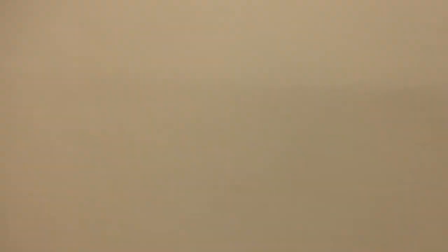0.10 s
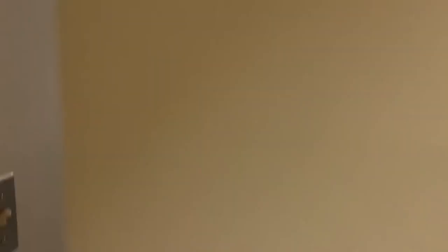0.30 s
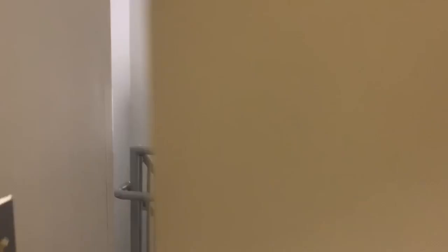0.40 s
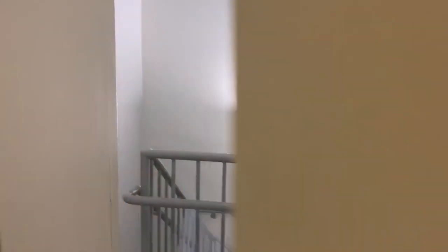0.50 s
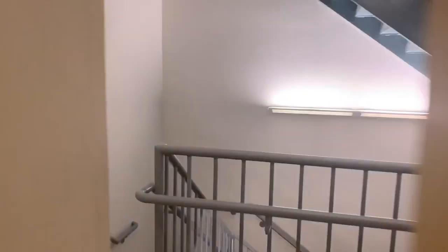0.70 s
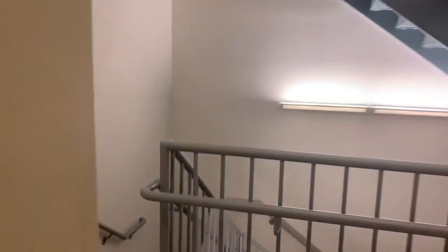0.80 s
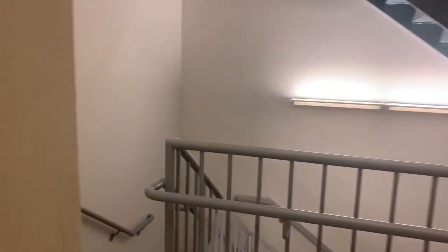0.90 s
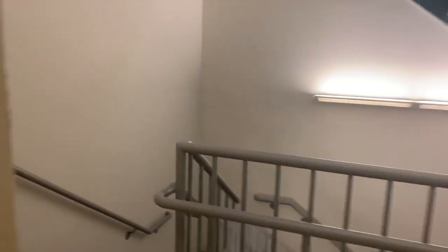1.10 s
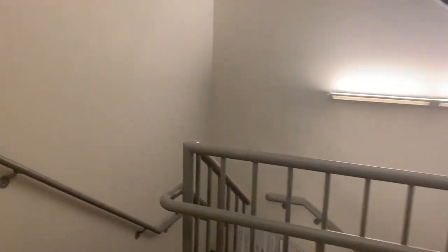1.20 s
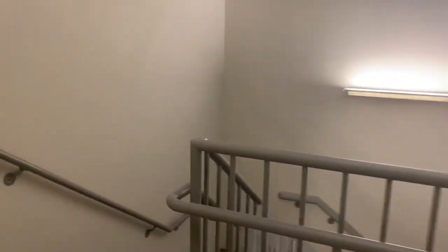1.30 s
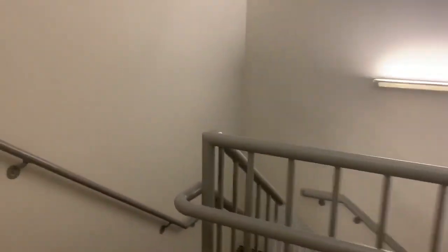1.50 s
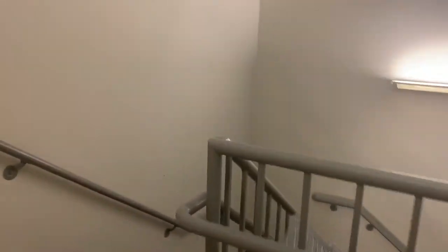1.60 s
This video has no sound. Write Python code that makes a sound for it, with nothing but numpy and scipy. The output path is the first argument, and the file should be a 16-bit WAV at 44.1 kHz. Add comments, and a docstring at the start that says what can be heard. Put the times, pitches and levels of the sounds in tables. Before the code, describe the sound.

Close handheld microphone passing through a heavy door into a hard stairwell: faint rubbing, hinge creak, boomy thuds, then a metallic rattle and hard latch clack, tiny squeak and knock, over quiet building hum.

```python
"""A heavy door is pushed open into a hard-walled stairwell, over the steady hum of the building.
Its hinge sings thin stick-slip notes, while footsteps and the passing air thud at the microphone:
sagging sine cycles for the thumps, low coloured noise for the air.
The push bar rattles in noise bursts with ringing modes, the latch springs out with a sharp clack
that rings the door, and a short squeak and a lighter knock follow in the decaying-noise echo."""
import sys
import numpy as np
from scipy import signal
from scipy.fft import rfft, irfft
from scipy.io import wavfile
from scipy.ndimage import uniform_filter1d

SR = 44100
rng = np.random.default_rng(int(sys.argv[2]) if len(sys.argv) > 2 else 0)


def master(y):
    """Save y as 16-bit WAV."""
    cut = np.clip(np.atleast_2d(y).T, -1, 1)
    pcm = np.round(cut * 32767)  # scale
    wavfile.write(sys.argv[1], SR, pcm.astype(np.int16))


N = 72765
T = np.arange(N) / SR

# spectrum of the rubbing surfaces, shared by rub and ticks [f/Hz, relative density/dB]
RUB_COLOUR = [(300, 1.5), (2000, 0), (5000, -8.5), (8000, -16)]
EARS = np.array([[1], [-1]])  # left, right
WIDE_HZ = 805  # the two ears differ fully above this
ATTACK_S = 0.001
SMALL_PART_DECAY_S = 0.014  # knocks and ticks


def undb(db):
    """Level to amplitude: 20 dB is a factor of ten."""
    return 10 ** (np.asarray(db) / 20)


def unit(x):
    """Normalisation of the mean square: scale to rms 1."""
    return x / np.sqrt(np.mean(x ** 2) + 1e-20)


def over_hz(points, hz):
    """Interpolate (f/Hz, value) points on a logarithmic frequency axis, as pitch is heard."""
    p = np.array(points, float)
    return np.interp(np.log(hz + 1), np.log(p[:, 0]), p[:, 1])


def fader(rows):
    """Envelope linear in level from rows of (t/s, .., level/dB), decaying exponentially outside them."""
    p = np.array(rows, float)
    outside = np.maximum(p[0, 0] - T, 0) + np.maximum(T - p[-1, 0], 0)
    return undb(np.interp(T, p[:, 0], p[:, -1])) * np.exp(-outside / 0.015)


def walk(rate):
    """Low-passed random fluctuation of rms 1: white noise averaged twice over 1/rate seconds."""
    size = int(SR / rate)
    smooth = uniform_filter1d(rng.standard_normal(N), size, mode="wrap")
    return unit(uniform_filter1d(smooth, size, mode="wrap"))


def noise(colour, tilt_db=0, peak_hz=1000, peak_db=0):
    """Spectrally shaped noise of rms 1; interaural coherence rises toward the bass."""
    peak_width_octaves = 0.09
    hz = np.arange(N // 2 + 1) * SR / N
    mid, side = rfft(rng.standard_normal((2, N)))
    side = side * np.minimum((hz / WIDE_HZ) ** 0.42, 1)
    peak = peak_db / (1 + (np.log2((hz + 1) / peak_hz) / peak_width_octaves) ** 2)
    tilt = tilt_db * np.log2(hz / 1000 + 0.079)
    low_cut = hz / np.hypot(hz, 20)
    gain = undb(over_hz(colour, hz) + tilt + peak) * low_cut
    return unit(irfft(np.array([mid + side, mid - side]) * gain, N))


def blow(start, decay, attack):
    """Impact envelope: a quick attack, then the exponential release of a damped system."""
    age = np.maximum(T - start, 0)
    return (1 - np.exp(-age / attack)) * np.exp(-age / decay)


def ring(start, modes):
    """Modal synthesis: damped sines, with an interaural phase difference that grows with frequency."""
    age, out = np.maximum(T - start, 0), 0
    for hz, db, t60 in modes:
        skew = rng.choice([-1, 1]) * min(hz / WIDE_HZ, 1) ** 2 * np.pi / 4 * EARS
        wave = np.sin(2 * np.pi * hz * age + skew + rng.uniform(0, 2 * np.pi))
        out = out + undb(db) * blow(start, t60 / np.log(1000), ATTACK_S) * wave
    return out


def taps(rows, colour, decay):
    """Impact noise: grainy bursts, each exciting the resonance of a different small part."""
    grain_db, grain_per_s, attack_s, resonance_db = 1.5, 1500, 0.0014, 9
    grain = unit(undb(grain_db * walk(grain_per_s)))
    bursts = 0
    for start, db, tilt, hz in rows:
        burst = blow(start, decay, attack_s) * noise(colour, tilt, hz, resonance_db)
        bursts = bursts + undb(db) * burst
    return grain * bursts


def hum():
    """Tonal and broadband machine noise: wavering mains and fan lines over ventilation rumble."""
    # steady lines, levels on the near side of the doorway [f/Hz, level/dB]
    line_table = [(119, -42), (269.5, -49)]
    # ventilation spectrum [f/Hz, relative density/dB]
    vent_colour = [(25, -27.5), (55, 3.5), (130, -4), (400, -18), (2000, -36), (5000, -45.5), (9000, -53.5)]
    doorway_s, doorway_db, vent_db = 0.69, -9.5, -42.5
    lines = 0
    for hz, db in line_table:
        level = undb(db + 0.44 * walk(3.2))
        phase = 2 * np.pi * np.cumsum(hz * (1 + 0.0056 * walk(20.0))) / SR
        lines = lines + level * np.sqrt(2) * np.sin(phase)
    # the lines fall behind on the way through the door
    through = (1 + np.tanh((T - doorway_s) * 10)) / 2
    return lines * undb(doorway_db * through) + undb(vent_db) * noise(vent_colour)


def rub():
    """Sliding friction: soft broadband noise as the door swings."""
    # rubbing strength [t/s, level/dB]
    levels = [(0, -66.5), (0.24, -59), (0.33, -64.5), (0.42, -57), (0.7, -59), (0.85, -89)]
    return fader(levels) * noise(RUB_COLOUR)


def hinge():
    """Stick-slip oscillation: harmonic notes of gliding pitch, mostly sagging as the door slows."""
    # four notes, each a path of pitch and level [t/s, f/Hz, level/dB]
    high = [(0.018, 985, -66), (0.15, 973, -61), (0.237, 998, -43.5), (0.31, 995, -48), (0.389, 985, -47),
            (0.499, 965, -50.5), (0.549, 990, -74)]
    low = [(0.29, 849, -65), (0.39, 848.4, -54.5), (0.501, 846, -46.5), (0.55, 832, -63.5),
           (0.586, 832, -51), (0.691, 827.5, -56), (0.79, 816.4, -48), (0.83, 816, -62)]
    under = [(0.23, 724, -52.5), (0.325, 720, -50), (0.4, 700, -61)]
    thin = [(0.38, 1805, -66), (0.45, 1810, -63), (0.7, 1813, -75)]
    # overtones of each note, relative to its fundamental [second level/dB, third level/dB]
    overtones = [(-24, -38.5), (-19.5, -22), (-28, -19.5), (-28, -33.5)]
    waver, rough_db = 0.002, 1.2  # rms pitch fraction, rms level
    out = 0
    for note, (second_db, third_db) in zip((high, low, under, thin), overtones):
        p = np.array(note, float)
        pitch = np.interp(T, p[:, 0], p[:, 1]) * (1 + waver * walk(89))
        phase = 2 * np.pi * np.cumsum(pitch) / SR
        tone = np.sin(phase) + undb(second_db) * np.sin(2 * phase) + undb(third_db) * np.sin(3 * phase)
        out = out + fader(note) * undb(rough_db * walk(40)) * tone
    return np.sqrt(2) * out * np.ones((2, 1))


def buffet():
    """Turbulent pressure: low-frequency noise as air buffets the microphone."""
    # gusts [t/s, level/dB]
    gusts = [(0.19, -44.5), (0.25, -15), (0.275, -24), (0.33, -17.5), (0.355, -35), (0.42, -58),
             (0.53, -55), (0.565, -19), (0.61, -43), (0.76, -28.5), (0.845, -56), (0.875, -38), (0.92, -58)]
    # gust spectrum [f/Hz, relative density/dB]
    colour = [(20, -35), (48, 2), (90, 7.5), (210, -0.5), (500, -16.5), (800, -36), (2000, -69)]
    return fader(gusts) * noise(colour)


def thuds():
    """Damped oscillation: low thumps of footsteps and air, a few cycles that swell, sag in pitch and die."""
    # thumps [t/s, starting f/Hz, peak level/dB, rise/s, decay/s]
    thumps = [(0.235, 151.7, -11.5, 0.018, 0.0058), (0.272, 105.7, -17.5, 0.014, 0.036),
              (0.308, 89.4, -13.5, 0.01, 0.03), (0.324, 229.4, -25, 0.0065, 0.0071),
              (0.551, 130.6, -6.5, 0.014, 0.012), (0.569, 84.5, -14, 0.0066, 0.013),
              (0.677, 70.2, -16, 0.016, 0.033), (0.725, 69.2, -19, 0.014, 0.038),
              (0.862, 155.5, -21, 0.0094, 0.011), (0.88, 67.8, -24, 0.013, 0.016),
              (1.338, 107.7, -20, 0.017, 0.008)]
    sag_per_s = 5.3
    left_lag_s = 0.00023  # low sounds reach the left side later
    upper_ratio, upper_db = 1.88, -15  # a second, weaker, inharmonic partial of each thump
    out, heard = 0, T - np.array([[left_lag_s], [0]])
    for start, hz, db, rise, decay in thumps:
        age = np.maximum(heard - start, 0)
        swell = np.sin(np.pi / 2 * np.minimum(age / rise, 1)) ** 2
        shape = swell * np.exp(-np.maximum(age - rise, 0) / decay)
        phase = 2 * np.pi * hz * np.log1p(sag_per_s * age) / sag_per_s
        upper = undb(upper_db) * shape * np.sin(upper_ratio * phase)
        out = out + undb(db) * shape * (np.sin(phase) + upper)
    return out


def ticks():
    """Impulsive friction: faint short bursts within the rubbing."""
    # ticks [t/s, level before envelope/dB, tilt/(dB per octave), resonance f/Hz]
    rows = [(0.368, -41.5, -4, 2330), (0.421, -43, -1.5, 3440)]
    return taps(rows, RUB_COLOUR, SMALL_PART_DECAY_S)


def push_bar():
    """Impact excitation of a cavity: the sliding bar's linkage chatters and rings its hollow case."""
    # rattles [t/s, level before envelope/dB, tilt/(dB per octave), resonance f/Hz]
    rattles = [(0.981, -29.5, 1, 7400), (0.991, -23.5, -1.5, 3230), (1.008, -24.5, -4, 7060),
               (1.034, -30, -1.5, 4360), (1.043, -23.5, -1.5, 4600), (1.078, -27.5, -3.5, 3600),
               (1.093, -28, -1.5, 1950), (1.115, -21, -1, 2460)]
    # rattle spectrum [f/Hz, relative density/dB]
    colour = [(200, -35), (550, -0.5), (720, 7), (1000, -1.5), (3200, -3.5), (5500, -8.5), (10500, -0.5),
              (15500, -8.5)]
    # case modes before the pitch shift [f/Hz, level relative to the rattle/dB, t60/s]
    case_modes = [(690.7, -15, 0.16), (754.6, -13.5, 0.15), (838, -22.5, 0.27), (958, -21, 0.34),
                  (4086, -22, 0.08), (6970, -18, 0.16), (10500, -20, 0.06), (11757, -24, 0.093)]
    decay_s, shift = 0.015, 0.04  # the ring changes pitch from rattle to rattle
    case = 0
    for start, db, _, _ in rattles:
        pitch_ratio = 1 + shift * rng.uniform(-0.96, 1)
        case = case + undb(db) * ring(start, np.array(case_modes) * [pitch_ratio, 1, 1])
    return taps(rattles, colour, decay_s) + case


def latch():
    """Impact and modal response: a bright bolt strike, then a clack that rings the door to a hard stop."""
    # spectra of bolt and clack [f/Hz, relative density/dB]
    bolt_colour = [(300, -12), (1200, 5.5), (2200, -10), (3400, 8.5), (5500, -9), (15500, -10)]
    clack_colour = [(60, -7), (230, 6.5), (380, -4.5), (570, 9), (850, -11.5), (1300, -4), (2200, -17.5),
                    (3500, -8.5), (6000, -19.5), (14000, -53)]
    # modes of door leaf and latch case [f/Hz, level/dB, t60/s]
    door_modes = [(172.2, -27, 0.55), (229.2, -19, 0.14), (302, -34, 0.44), (388.8, -37.5, 0.61),
                  (526, -15, 0.13), (621.5, -11, 0.073), (673, -21.5, 0.089), (790, -34, 0.21),
                  (974, -32, 0.12), (1197, -25.5, 0.13), (1373, -31, 0.2), (1436, -29, 0.11),
                  (1585, -33, 0.13), (1770, -27, 0.12), (2634, -39, 0.21), (2853, -28.5, 0.096),
                  (3380, -25.5, 0.083), (3530, -26.5, 0.094), (4390, -25, 0.064)]
    bolt_s, bolt_db, bolt_decay_s = 1.122, -12.5, 0.0053
    clack_s, clack_db, clack_decay_s = 1.1248, -14.5, 0.017
    stop_s, stop_db, stop_push_s = 1.1284, -17, 0.00026
    pan_db = 0.5  # left minus right
    bolt = undb(bolt_db) * blow(bolt_s, bolt_decay_s, ATTACK_S) * noise(bolt_colour)
    clack = undb(clack_db) * blow(clack_s, clack_decay_s, ATTACK_S) * noise(clack_colour)
    # the hard contact at the end of travel is one brief pressure pulse
    push = (T - stop_s) / stop_push_s
    stop = undb(stop_db) * (1 - 2 * push ** 2) * np.exp(-push ** 2)
    return bolt + (clack + stop + ring(clack_s, door_modes)) * undb(EARS * pan_db / 2)


def squeak():
    """Stick-slip excitation: a brief slip of metal on metal stirs two resonances."""
    # squeak spectrum [f/Hz, relative density/dB]
    colour = [(3150, -22), (3450, 9.5), (3900, -31), (6350, 0), (7300, -32.5)]
    centre_s, half_width_s, level_db = 1.295, 0.019, -48.5
    swell = np.exp(-((T - centre_s) / half_width_s) ** 2)
    return undb(level_db) * swell * noise(colour)


def knocks():
    """Damped impacts: a lighter knock and two fainter, duller ones."""
    # knocks [t/s, level before envelope/dB, tilt/(dB per octave), resonance f/Hz]
    rows = [(1.3655, -27, -2, 940), (1.466, -50, -12, 620), (1.588, -40.5, -7, 671)]
    # knock spectrum [f/Hz, relative density/dB]
    colour = [(150, 5), (600, -8.5), (1000, 3), (1300, 2), (2050, 3), (2900, -35), (4700, -11.5),
              (10000, -35)]
    return taps(rows, colour, SMALL_PART_DECAY_S)


def stairwell(x):
    """Diffuse reverberation: convolution with noise whose decay time varies with frequency."""
    # reverberation time [f/Hz, t60/s]
    t60_points = [(100, 2), (500, 0.62), (1500, 1.07), (3500, 0.92), (6500, 0.41), (9000, 0.13),
                  (15000, 0.28)]
    # echo colour [f/Hz, level/dB]
    colour = [(100, 2.5), (600, 1), (2000, -6), (5000, 0), (10000, 7), (15000, -2.5)]
    build_s = 0.0089
    hz = np.arange(N // 2 + 1) * SR / N
    centres = np.geomspace(100, 15000, 10)
    wash, echo = rfft(noise([(20, 0), (20000, 0)])), 0
    for centre, pick in zip(centres, np.eye(len(centres))):
        # overlapping triangular bands on a log axis
        band = irfft(wash * np.interp(np.log(hz + 1), np.log(centres), pick), N)
        decay = np.exp(-np.log(1000) * T / over_hz(t60_points, centre))
        echo = echo + band * undb(over_hz(colour, centre)) * decay
    echo = echo * (1 - np.exp(-T / build_s)) / np.sqrt(SR * .07)
    return signal.fftconvolve(x, echo, axes=1)[:, :N]


def scene():
    """Superposition: direct sounds, their reverberant field, and the unreverberated air, rub and hum."""
    # each source with its send to the stairwell in dB
    sources = [(hinge(), -10), (thuds(), -13), (push_bar(), -1), (latch(), -12),
               (knocks() + ticks() + squeak(), -4.5)]
    direct = sum(x for x, _ in sources)
    echo = stairwell(sum(x * undb(send_db) for x, send_db in sources))
    return direct + echo + buffet() + rub() + hum()


def record(dry):
    """Linear filtering: the microphone has two treble notches and the recorder cuts the top."""
    # microphone notches [f/Hz]
    dips_hz = [8600, 13500]
    dip_q, top_hz = 6.35, 16000
    for hz in dips_hz:
        dry = signal.lfilter(*signal.iirnotch(hz, dip_q, fs=SR), dry)
    return signal.sosfilt(signal.ellip(8, .2, 70, top_hz, fs=SR, output="sos"), dry)


dry = scene()
out = record(dry)
master(out)
```